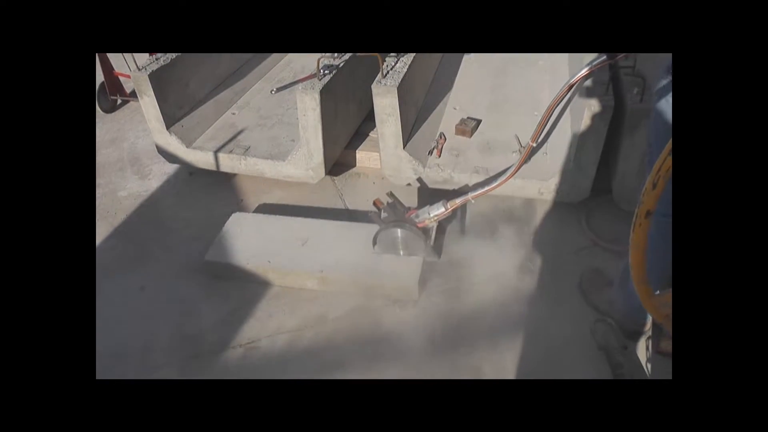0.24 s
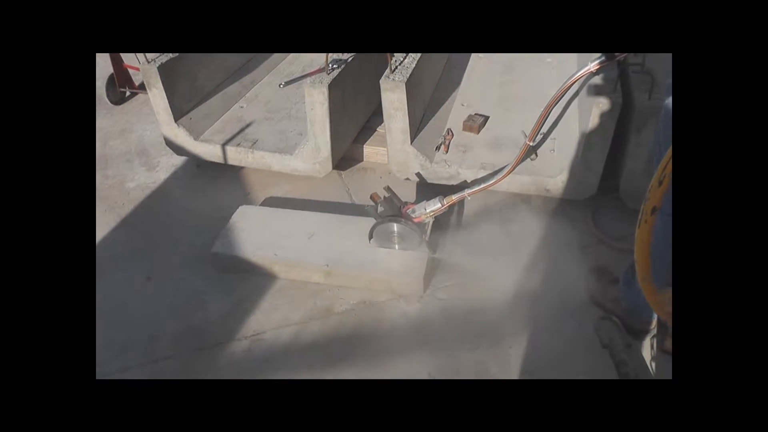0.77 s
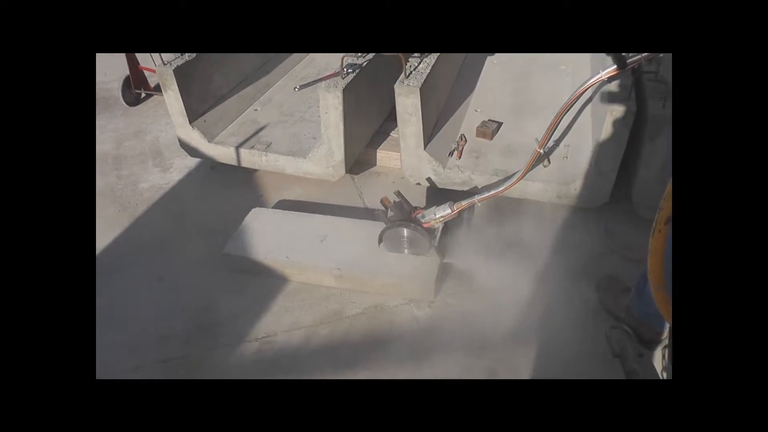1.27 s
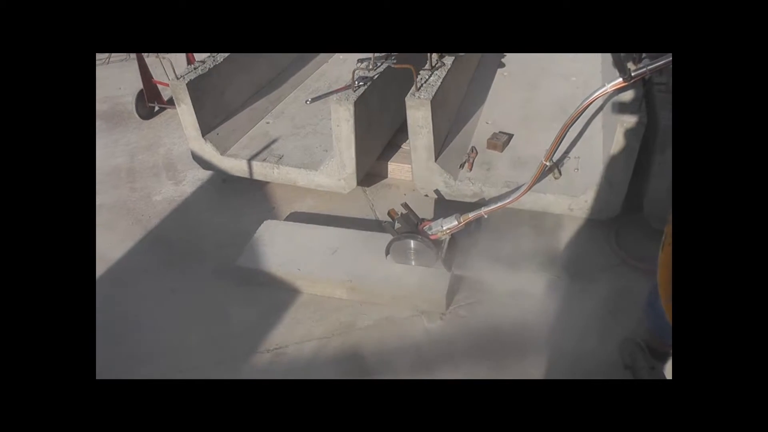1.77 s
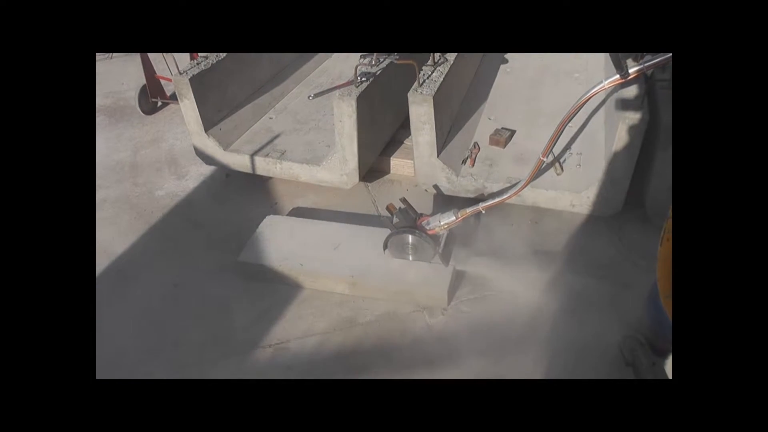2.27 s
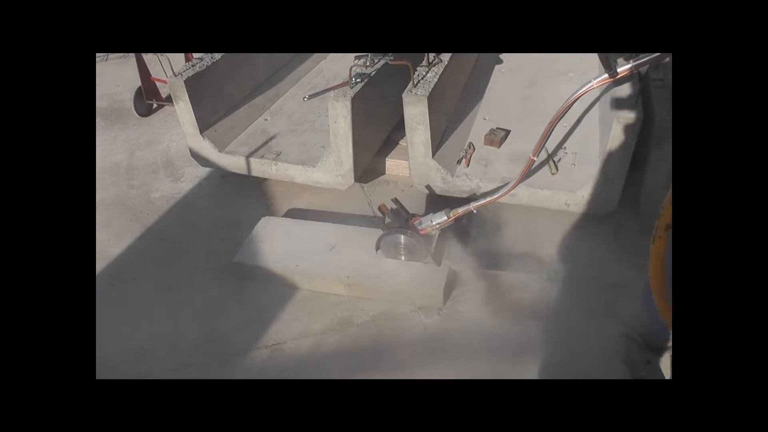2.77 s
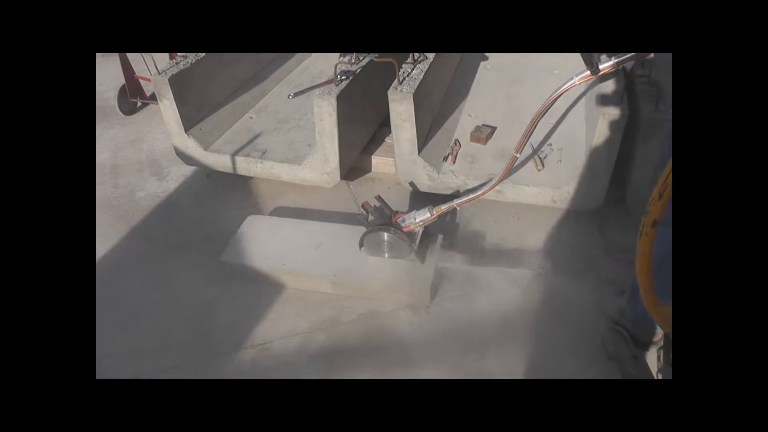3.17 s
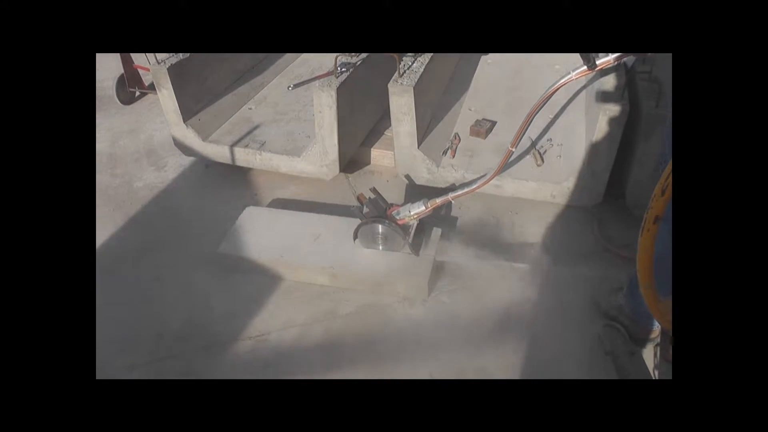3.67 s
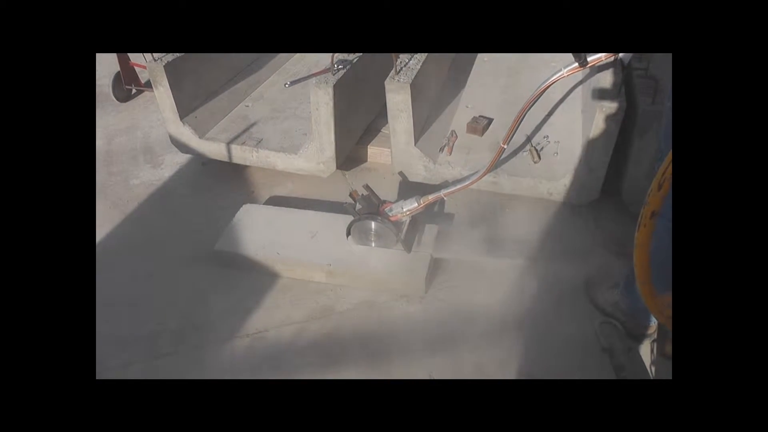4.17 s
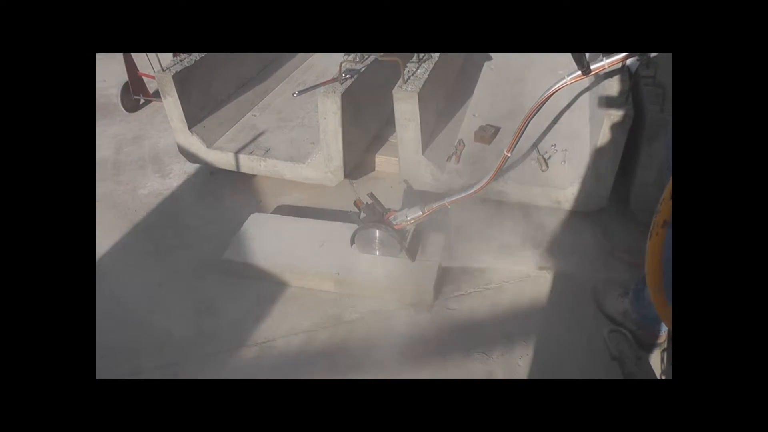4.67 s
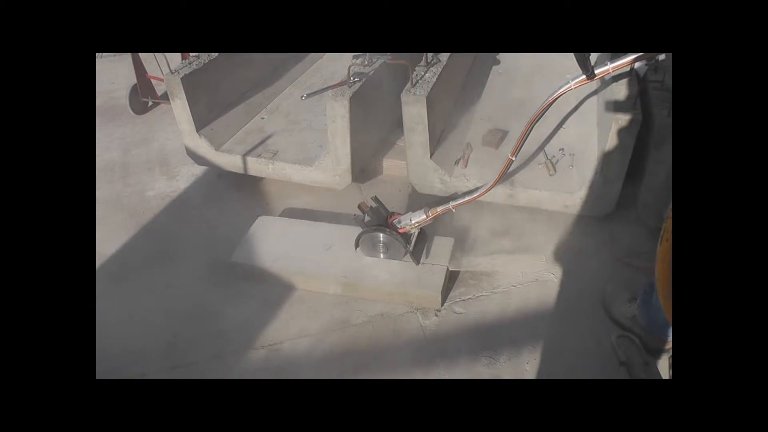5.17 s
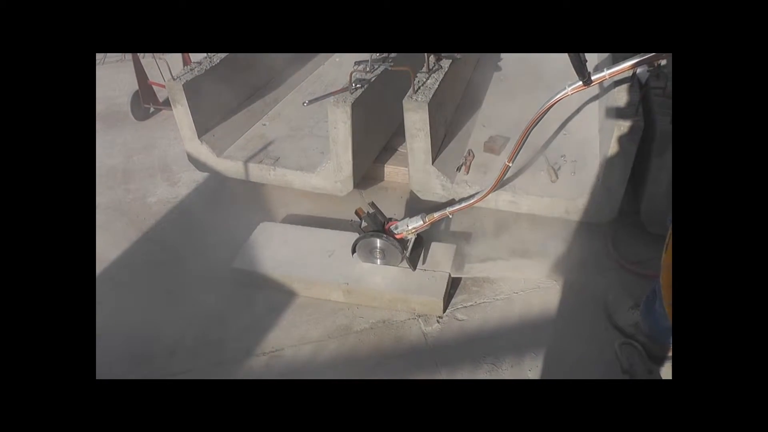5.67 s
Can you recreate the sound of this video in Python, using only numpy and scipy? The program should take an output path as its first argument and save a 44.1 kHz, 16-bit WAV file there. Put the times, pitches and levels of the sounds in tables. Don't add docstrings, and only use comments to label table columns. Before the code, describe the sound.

Continuous power-saw noise in an outdoor yard: first a quick rising motor howl, then a dense high whine with hissing exhaust, concrete grinding and a ringing steel disc. Pitch sags briefly soon after one second, then recovers and drifts under load. A narrow whistle appears just after two seconds. Unprotected stereo microphone catches crackly wind clicks and low buffets throughout; no voices, and the saw runs to the end.

```python
import sys
import numpy as np
from scipy import signal
from scipy.fft import rfft, irfft, next_fast_len
from scipy.io import wavfile
from scipy.ndimage import uniform_filter1d, map_coordinates

SR = 44100
rng = np.random.default_rng(int(sys.argv[2]) if len(sys.argv) > 2 else 0)


def level_to_linear(level):
    exponent = np.asarray(level, float) / 20
    return 10 ** exponent


def wrap_up_sound(samples):
    columns = np.atleast_2d(samples).T
    tamed = np.clip(columns, -1, 1)
    steps = np.round(tamed * 32767).astype(np.int16)
    wavfile.write(sys.argv[1], SR, steps)


N = 261513


def unit(x):
    return x / np.sqrt(np.mean(np.abs(x) ** 2) + 1e-20)


def along(points, hz):
    f, v = np.transpose(points)
    return np.interp(np.log(hz + 1), np.log(f + 1), v)


def curves(rows):
    s, *cols = np.transpose(rows)
    return [np.interp(np.arange(N) / SR, s, c) for c in cols]


def swell(rows):
    t = np.arange(N) / SR
    return sum(db * np.exp(-((t - s) / w) ** 2) for s, w, db in rows)


def wobble(rate):
    return map_coordinates(rng.standard_normal(400), [np.arange(N) * min(rate, 60) / SR])


def filtered(x, response):
    m = next_fast_len(N + SR // 2)
    return irfft(rfft(x, m) * response(np.fft.rfftfreq(m, 1 / SR)), m)[..., :N]


def rush(gain, patchy_db):
    z = signal.stft(rng.standard_normal(N), nperseg=256)[2]
    field = uniform_filter1d(rng.standard_normal(z.shape), size=8, axis=0)
    field = uniform_filter1d(field, size=8, axis=1)
    patchy = signal.istft(z * level_to_linear(patchy_db * unit(field)), nperseg=256)[1][:N]
    return unit(filtered(patchy, gain))


def mode(hz, width_hz, shift):
    pole = np.exp(-np.pi * width_hz / SR)
    drive = signal.lfilter([1], [1, -pole], rng.standard_normal((2, N)))
    turn = 2 * np.pi * (hz * np.arange(N) / SR + shift)
    return unit(drive[0] * np.cos(turn) + drive[1] * np.sin(turn))


def scattered(column, db):
    # (start time [s], length [s], pop rate [1/s], push rate [1/s])
    gusts = [(.2, .07, 85, 0), (.44, .05, 190, 60), (.7, .07, 50, 0), (1.005, .125, 70, 0),
             (1.26, .05, 50, 0), (2.09, .17, 50, 0), (2.43, .05, 120, 0), (2.54, .16, 50, 0),
             (2.7, .22, 80, 0), (3.03, .14, 50, 0), (3.21, .12, 100, 0), (3.32, .22, 190, 50),
             (3.55, .16, 95, 0), (4.36, .05, 120, 0), (4.4, .075, 220, 80), (4.475, .15, 90, 0),
             (4.87, .03, 70, 0), (5.09, .035, 100, 0), (5.69, .07, 70, 0)]
    uneven = .8
    scatter_db = 2.5
    runs = []
    for gust in gusts:
        start, length = gust[0], gust[1]
        early_late, strength = rng.random(60), rng.standard_normal(60)
        n = round(length * gust[column])
        place = (np.arange(n) + .5 + uneven * (early_late[:n] - .5)) / max(n, 1)
        runs.append(np.transpose([start + length * place, db + scatter_db * strength[:n]]))
    return np.vstack(runs)


def pops(events, lobes, trim_db, lean_db):
    s, db = np.transpose(events)
    stretch, late, lean = rng.standard_normal((len(s), 3)).T[:, :, None]
    sample = np.arange(700) - 100
    u = (sample / SR * 1000 - .25 * late) * np.exp(.2 * stretch)
    shape = 0
    for at, width, left, right in lobes:
        push = np.exp(-.5 * ((u - at) / width) ** 2)
        shape = shape + push * np.array([left, right])[:, None, None]
    shape = shape * level_to_linear(db[:, None] + trim_db + lean_db * np.array([lean, -lean]))
    where = np.round(s * SR).astype(int)[:, None] + sample
    return np.array([np.bincount(where.ravel(), side.ravel(), N + SR)[:N] for side in shape])


def buffeting(stir):
    # (frequency [Hz], density [dB per Hz])
    rumble = [(20, 3), (50, 7), (85, 4), (130, 4), (250, 2), (400, -44), (900, -14)]
    spectrum = lambda hz: level_to_linear(along(rumble, hz))
    mid = rush(spectrum, patchy_db=6.0)
    side = 2.1 * rush(spectrum, patchy_db=1.5)
    level = level_to_linear(-66 + 2.5 * wobble(3)) + level_to_linear(-9) * stir
    return level * np.array([mid + side, mid - side]) * level_to_linear([[-.7], [.7]])


def wind():
    # (delay [ms], width [ms], left [ratio], right [ratio])
    sharp_lobes = [(-.36, .04, .2, -.2), (-.22, .04, -.65, .7), (0, .075, 1.4, -1.3), (.45, .2, -.3, .92),
                   (1.8, .65, .14, -.26), (5, 2, -.05, .06)]
    # (delay [ms], width [ms], left [ratio], right [ratio])
    soft_lobes = [(-.44, .09, .9, -.5), (0, .18, -.55, 1.4), (1.4, .7, .15, -.35)]
    # (delay [ms], width [ms], left [ratio], right [ratio])
    thud_lobes = [(-.35, .07, -.55, -.35), (0, .13, 1.0, 1.1), (.3, .4, .4, .55), (2.4, 1.2, -.28, -.4),
                  (8, 2.6, .085, .14)]
    # (time [s], peak level [dB])
    heavy = [(.205, -26), (.261, -35), (.455, -32), (.491, -30), (1.014, -26), (1.052, -35), (1.084, -30),
             (1.323, -36), (1.406, -36), (2.19, -34), (2.301, -35), (2.441, -36), (2.642, -34),
             (2.765, -30), (2.857, -30), (2.911, -33), (3.359, -28), (3.408, -31), (3.44, -28), (3.49, -31),
             (3.534, -32), (3.603, -33), (4.364, -33), (4.445, -27), (4.471, -27), (4.532, -31),
             (4.586, -32), (4.618, -32), (4.816, -33), (5.175, -33)]
    nudges = [2.095, 2.238, 2.47, 2.665, 2.785, 2.834, 3.14, 3.283, 3.576, 3.637, 3.757, 4.195, 4.511, 4.6,
              4.684, 4.777, 4.87, 4.958, 5.11, 5.457, 5.72]
    # (time [s], peak level [dB])
    lone = [(.317, -25), (.581, -29), (.639, -24), (.879, -23), (1.179, -22), (1.206, -24), (1.366, -25),
            (1.772, -22), (3.747, -25), (3.757, -28), (3.886, -29), (3.956, -27), (4.168, -25),
            (4.195, -23), (4.283, -30), (4.684, -22), (4.718, -25), (4.777, -23), (4.848, -26),
            (4.958, -25), (4.967, -26), (5.168, -25), (5.181, -24), (5.433, -26), (5.457, -26),
            (5.869, -28), (5.877, -27), (5.907, -26)]
    nudge_db, push_db, sharp_db, soft_db = -39.5, -31.5, -24, -29.5
    blunt_share = .33

    light = [(s, nudge_db) for s in nudges]
    pushes = np.vstack([heavy, light, scattered(column=3, db=push_db)])
    flurry = scattered(column=2, db=sharp_db)
    blunt = rng.random(len(flurry)) < blunt_share
    sharp = np.vstack([lone, flurry[~blunt]])
    soft = flurry[blunt] + [0, soft_db - sharp_db]
    s, db = np.repeat(np.transpose(pushes), 3, axis=1)
    near, size = rng.standard_normal((len(s), 2)).T
    eddies = np.transpose([s + .0045 * near, db + 2 * size])

    snaps = pops(sharp, sharp_lobes, trim_db=0, lean_db=1)
    snaps = snaps + pops(soft, soft_lobes, trim_db=-.5, lean_db=1.5)
    snaps = snaps + pops(eddies, sharp_lobes, trim_db=0, lean_db=.7)
    thuds = pops(pushes, thud_lobes, trim_db=1.5, lean_db=1.5)
    power = np.mean(thuds ** 2 + 0.039 * snaps ** 2, axis=0)
    stir = np.sqrt(np.abs(uniform_filter1d(power, size=900)))
    return buffeting(stir) + snaps + thuds


def speed():
    # (time [s], vane rate [Hz])
    run_up = [(0, 121.8), (.06, 179.6), (.115, 256), (.17, 373.5), (.21, 434), (.32, 524), (.37, 592.1),
              (.44, 643), (.52, 655)]
    # (time [s], vane rate [Hz])
    loaded = [(.585, 691), (0.662, 657), (.92, 680), (1.041, 652), (1.2, 555), (1.47, 619.6), (1.72, 595),
              (2.26, 605), (2.609, 590), (2.91, 615.4), (3.14, 585.6), (3.55, 602.6), (3.8, 589.3),
              (4.3, 594), (4.74, 638), (4.97, 591), (5.22, 635), (5.72, 589.3)]
    inertia_s = .045
    rate = curves(np.vstack([run_up, loaded]))[0]
    return uniform_filter1d(rate, size=round(inertia_s * SR), mode="nearest")


def motor():
    # (vane rate [Hz], 1st order [dB], 2nd order [dB], 3rd order [dB], 4th order [dB])
    order_law = [(149, -57, -49, -70, -75), (235, -38.5, -54, -71, -76), (307, -56, -58, -66, -62),
                 (527, -51, -67, -40, -65), (581.7, -59, -64, -46.5, -53.5),
                 (601.3, -61.5, -57.5, -47, -54), (635, -54, -55, -40, -66), (680, -53.5, -54, -37.5, -55)]
    # (time [s], half width [s], level [dB])
    hum_fades = [
        (.42, 0.05, 0),
        (1.12, 0.041, -14),
        (2.5, 1, -5.5),
    ]
    # (time [s], half width [s], loss [dB])
    chokes = [
        (.34, 0.015, 10),
        (.39, 0.042, -7),
        (1.25, 0.041, 6),
        (1.65, 0.2, -4.5),
        (3.6, 0.17, 3.5),
        (4.3, .1, -3.5),
        (4.5, 0.062, 7),
        (4.99, 0.035, 1),
        (5.55, 0.097, -4),
        (5.76, 0.1, 15),
    ]
    choke_gain = .35
    hz = speed()
    turn = 2 * np.pi * np.cumsum(hz * (1 + 0.0025 * wobble(30))) / SR
    rate, *levels = np.transpose(order_law)
    first, second, third, fourth = [np.interp(hz, rate, db) for db in levels]
    choke = swell(chokes)
    orders = [first + swell(hum_fades), second, third - choke, fourth + choke_gain * choke]
    whine = 0
    for k, db in enumerate(orders, start=1):
        unsteady_db = 1.17 * wobble(22) + 0.6 * wobble(13)
        whine = whine + np.sqrt(2) * level_to_linear(db + unsteady_db) * np.sin(k * turn)
    return whine


def hiss(level_db):
    # (frequency [Hz], density [dB per Hz])
    jet = [(3500, -28), (5000, -9.5), (6500, -0.5), (8000, -1.5), (9500, 3.5), (10500, -0.5), (11800, 3),
           (12200, -2), (14000, -8.5), (15700, -10)]
    return level_to_linear(level_db - 1.0) * rush(lambda hz: level_to_linear(along(jet, hz)), patchy_db=1.6)


def grind(bite_db):
    # (frequency [Hz], density [dB per Hz])
    grind_noise = [(250, -11), (700, -13), (1200, -12), (2000, -0.5), (2500, -9.5), (3000, -6), (3600, 1),
                   (5000, -3.5), (7000, -13), (11000, -7.5)]
    return level_to_linear(-39 + bite_db) * rush(lambda hz: level_to_linear(along(grind_noise, hz)), patchy_db=1.57)


def guard_drone(bite_db):
    # (frequency [Hz], width [Hz], level [dB])
    cavity_modes = [(1492, 63, -5.5), (1580, 20.6, 2), (1900, 550, -10.5), (2880, 35, -40)]
    # (time [s], half width [s], level [dB])
    drone_swells = [
        (.25, 0.22, 2.5),
        (1.35, 0.23, 1.5),
        (2.25, 0.11, -3),
        (3.05, 0.13, -1),
        (5.12, .08, 4),
    ]

    def cavity(f):
        total = 0
        for k, (centre, width, db) in enumerate(cavity_modes):
            band = 1j * f * width
            total = total + (-1) ** k * level_to_linear(db) * band / (centre * centre - f * f + band)
        return total

    follows = .5
    return level_to_linear(-44 + follows * bite_db + swell(drone_swells)) * rush(cavity, patchy_db=3.0)


def guard_whistle():
    # (time [s], share [0-1])
    lock = [
        (0, 0),
        (2.05, 0),
        (2.1, 1),
        (2.37, 1),
        (2.39, 0),
    ]
    return level_to_linear(-43) * curves(lock)[0] * mode(1560, 14, shift=0)


def blade(load_db):
    ring_hz = [3560, 3770, 5990, 6600, 7190, 7620, 8260, 8460, 9120, 9460, 10200, 10800, 11360, 11520,
               11780, 12320, 12550, 13000, 13560, 14400, 14930, 15400]
    # (width [Hz], level [dB])
    ring_modes = [(60, -54), (60, -52), (50, -53), (40, -66.5), (55, -43.5), (40, -48), (40, -47),
                  (35, -74.5), (60, -42.5), (60, -52), (150, -42.5), (90, -42), (40, -48), (50, -51),
                  (50, -50.5), (80, -53), (60, -59), (90, -67), (40, -45), (60, -56), (45, -52), (70, -71)]
    # (frequency [Hz], width [Hz])
    singers = [(4460, 35), (5345, 35), (6420, 40)]
    rest_db = [-55.5, -44.5, -43]
    # (time [s], half width [s], level [dB])
    song_swells = [
        [(.0, 0.13, -12), (.7, 0.81, 14), (3.4, 0.22, 10), (4.68, .15, 7)],
        [(.0, 0.13, -17), (.75, 0.75, 5), (4.0, 0.7, -3), (5.12, 0.18, 5.5)],
        [(.2, .3, 7.5), (2.15, 0.036, 6), (2.78, 0.17, 7), (3.4, .3, 6.5), (4.85, 0.3, -7)],
    ]
    shift = np.cumsum(.9 * (speed() - 600)) / SR
    ring = 0
    for hz, (width, db) in zip(ring_hz, ring_modes):
        ring = ring + level_to_linear(db + 1.46 * wobble(4.084)) * mode(hz, width, shift)
    song = 0
    for (hz, width), rest, rows in zip(singers, rest_db, song_swells):
        song = song + level_to_linear(rest + swell(rows) + 0.4 * wobble(9)) * mode(hz, width, shift)
    return level_to_linear(load_db) * ring + song


def saw():
    # (time [s], air jet [dB], bite [dB])
    cut_course = [(0, -32, 3.5), (.33, -32, 3), (.8, -32, 2.5), (1.3, -31, 4), (1.52, -33, 2.5),
                  (1.91, -32, 1.5), (2.8, -32, 2.5), (2.97, -33, 0.5), (3.35, -30.5, 3), (3.48, -34.5, 3),
                  (3.88, -31.5, -1), (4.2, -33.5, 0), (4.41, -31, 3), (4.49, -36, -0.5), (4.66, -32.5, 1),
                  (5.02, -33.5, -0.5), (5.15, -32.5, 1.5), (5.93, -32.5, 0)]
    jet_db, bite_db = curves(cut_course)
    chatter_db = 0.06 * wobble(17) + .5 * wobble(45)
    shaft = 1 + 0.11 * np.sin(2 * np.pi * np.cumsum(speed() / 7) / SR)
    cutting = hiss(jet_db) + grind(bite_db) + blade(jet_db + 32)
    return level_to_linear(chatter_db) * shaft * cutting + guard_drone(bite_db) + guard_whistle()


def scene():
    # (frequency [Hz], side over mid [dB])
    spread = [(300, -5), (700, -6), (1400, -13), (2000, -20), (3000, -45), (9300, -45), (10200, -17),
              (12000, -11), (15000, -10)]
    width = lambda hz: level_to_linear(along(spread, hz))
    mid = saw() + motor()
    yard = rng.standard_normal(6000) * np.exp(-np.arange(6000) / 1800)
    echoes = signal.fftconvolve(mid, yard / np.linalg.norm(yard))[:N]
    side = filtered(.95 * echoes, width)
    side = side + filtered(.25 * mid, lambda hz: width(hz) * np.sign(hz - 5000))
    return np.array([mid + side, mid - side]) + wind()


def roll_off(x):
    return signal.sosfilt(signal.butter(12, 15720, fs=SR, output="sos"), x)


def record(dry):
    top_hz, bass_hz, limit = 15750, 45, .2
    mid, side = (dry[0] + dry[1]) / 2, (dry[0] - dry[1]) / 2
    side = filtered(side, lambda hz: (hz < 5600) | (hz > 9300))
    band = lambda hz: (hz < top_hz) * hz ** 2 / (hz ** 2 + bass_hz ** 2)
    pair = filtered(np.array([mid + side, mid - side]), band)
    pair = pair / (1 + np.abs(pair / limit) ** 6) ** (1 / 6)
    return roll_off(pair)


dry = scene()
out = record(dry)
wrap_up_sound(out)
```